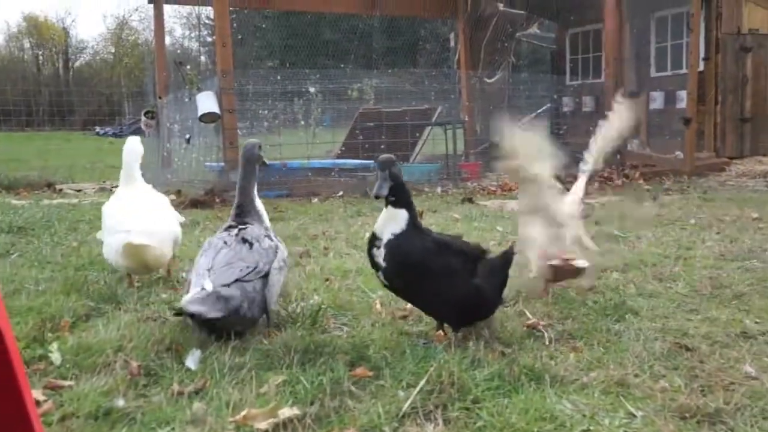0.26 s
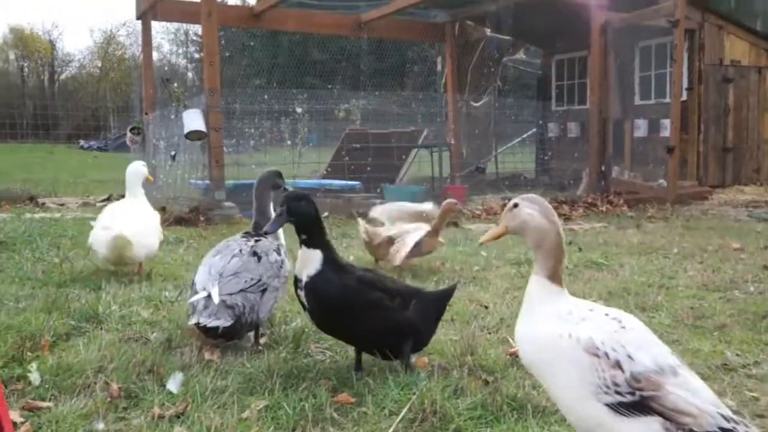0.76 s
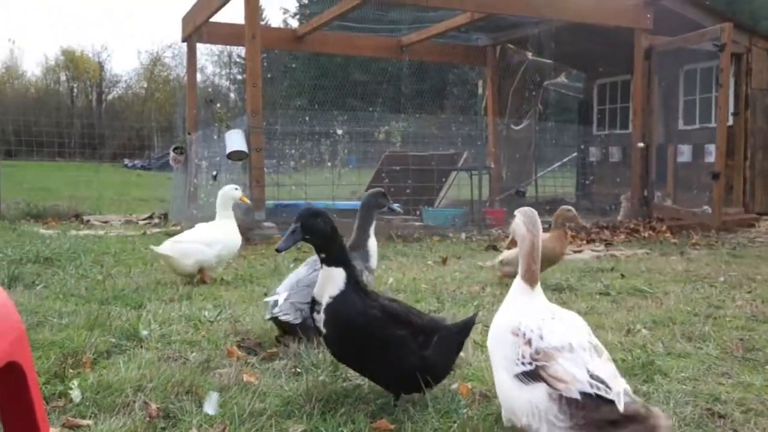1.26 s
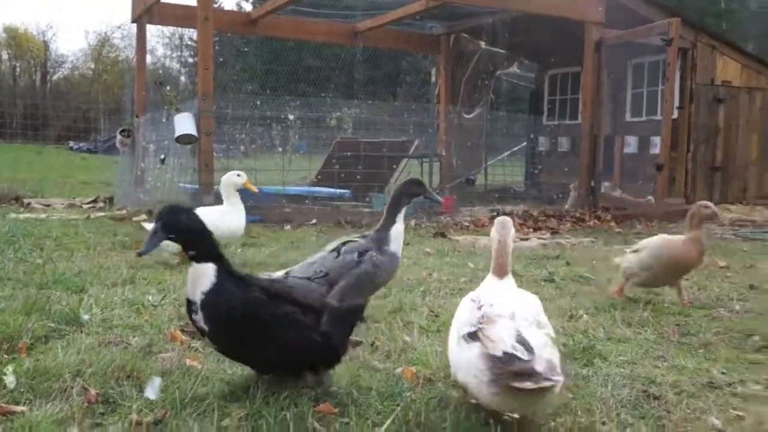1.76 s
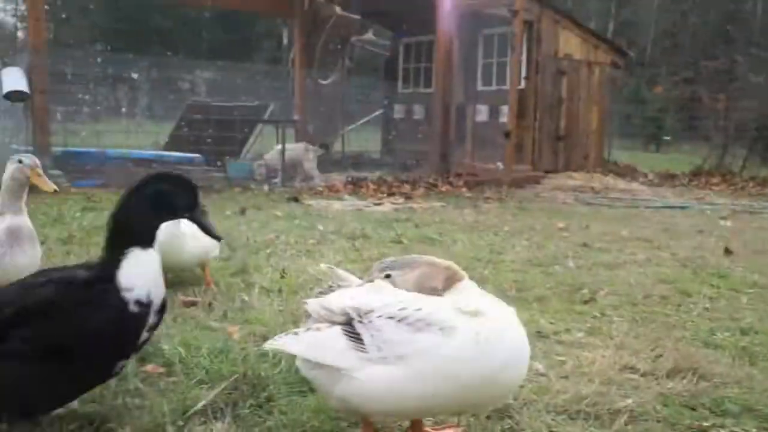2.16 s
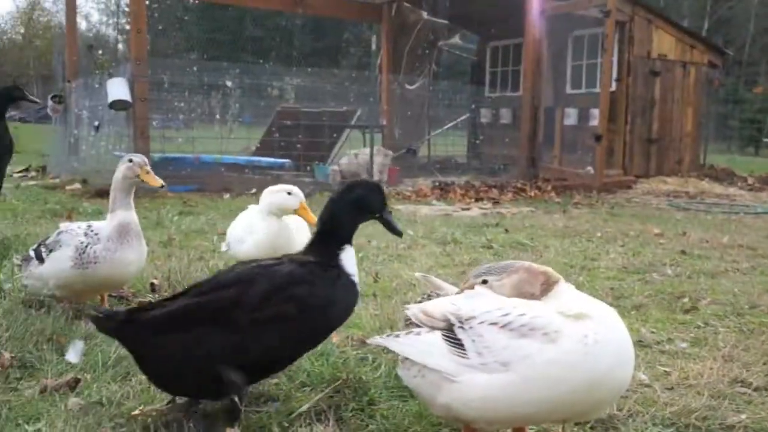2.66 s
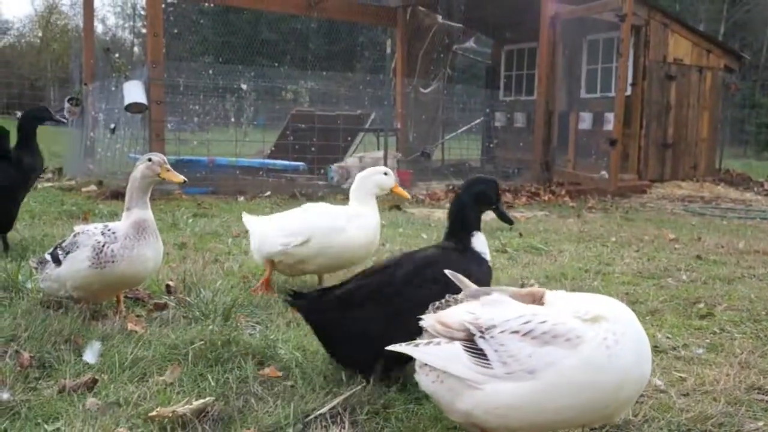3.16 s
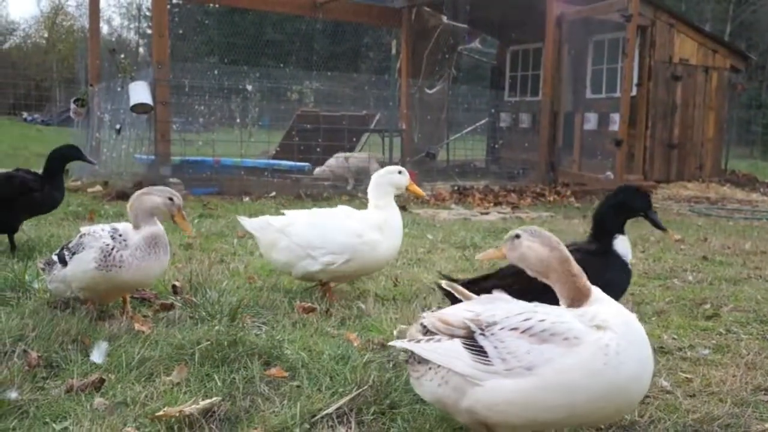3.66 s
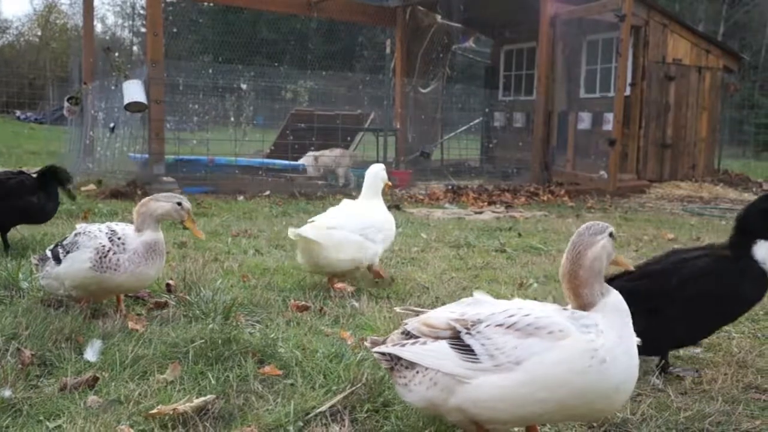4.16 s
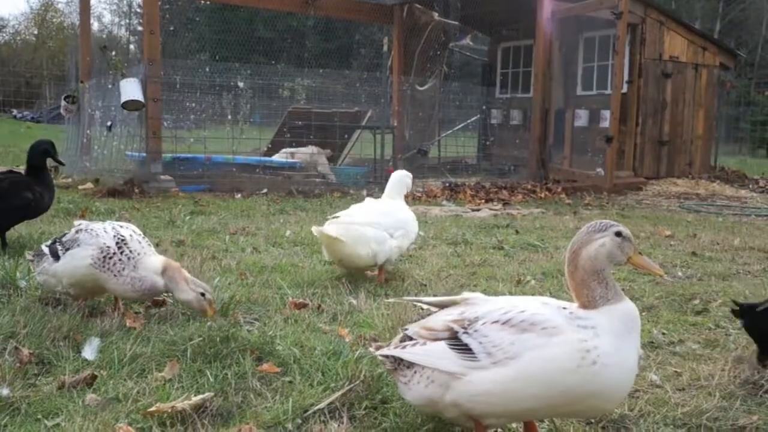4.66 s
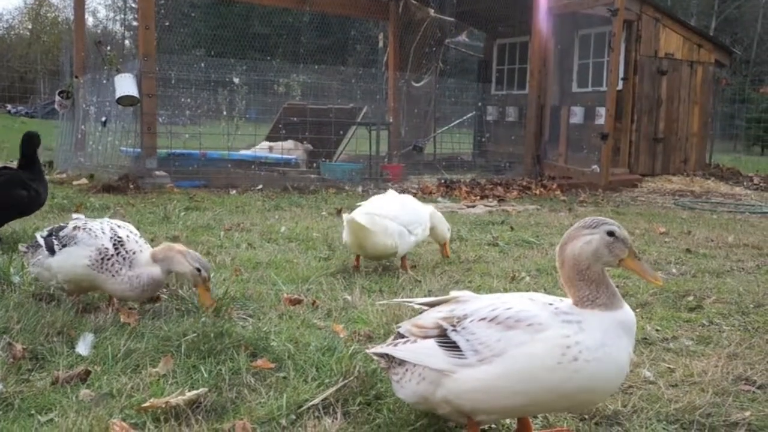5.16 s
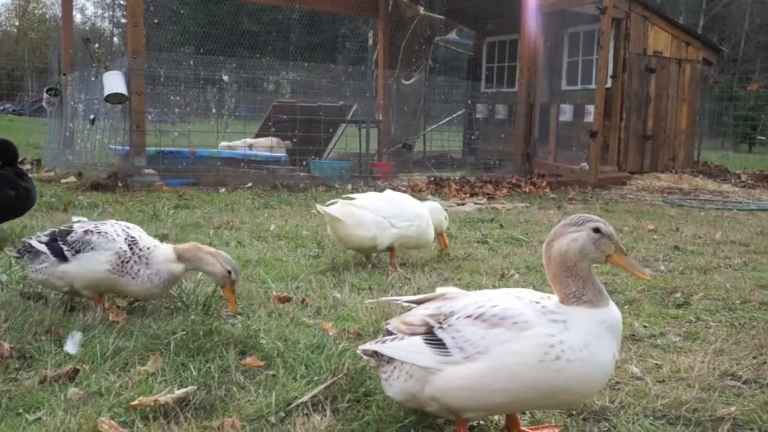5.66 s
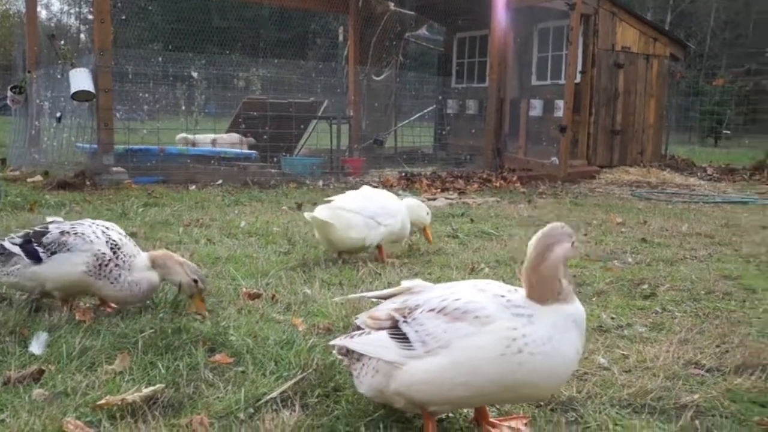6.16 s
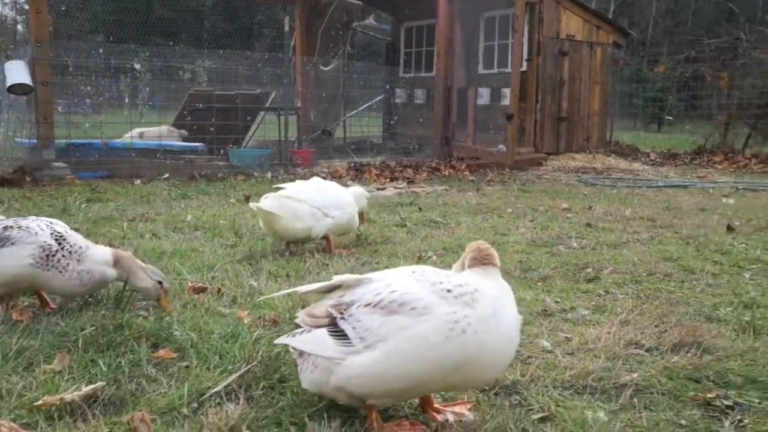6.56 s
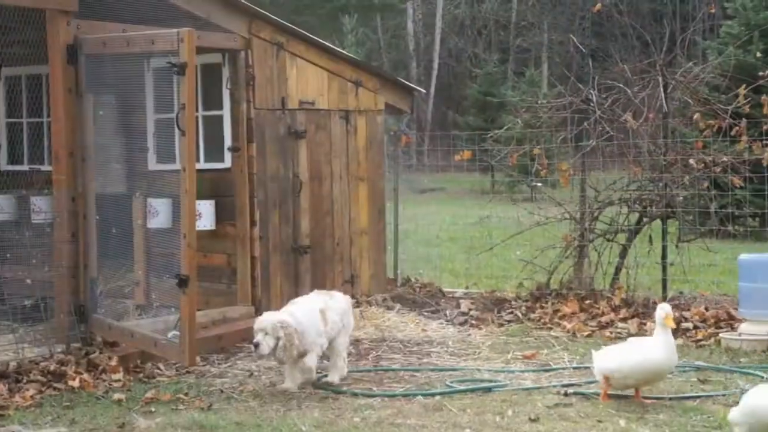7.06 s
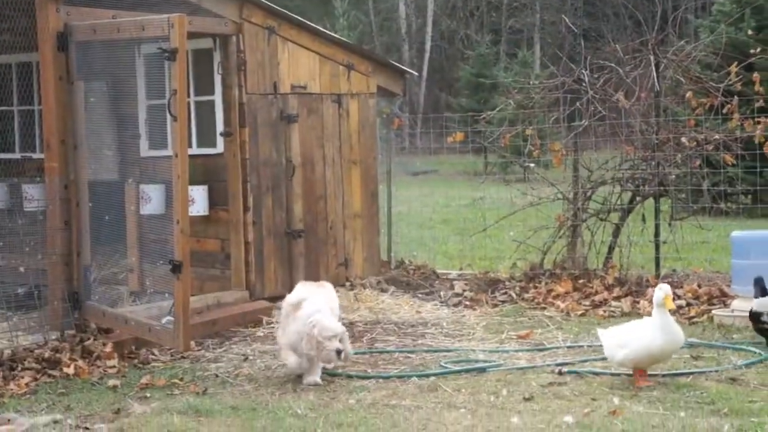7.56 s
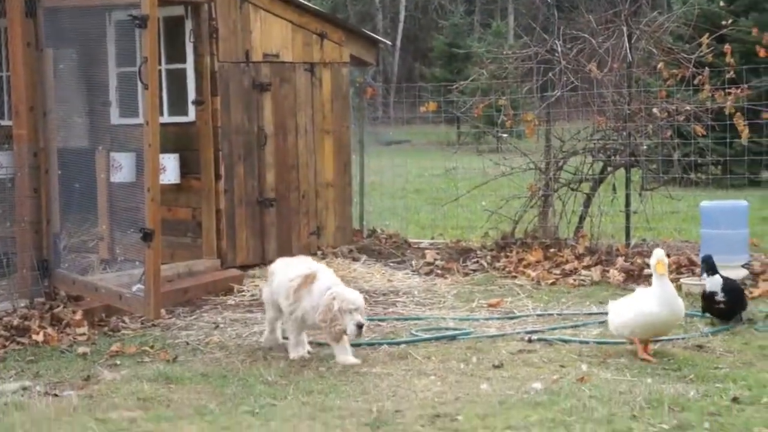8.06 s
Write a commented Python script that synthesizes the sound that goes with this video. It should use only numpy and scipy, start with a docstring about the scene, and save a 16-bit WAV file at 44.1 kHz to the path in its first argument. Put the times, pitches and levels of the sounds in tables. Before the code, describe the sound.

A flock of ducks gives short, loud, rattling quacks on a lawn, with soft clucks, thin squeals and a few wing beats.

```python
"""Loud rattling duck quacks on a lawn, among soft clucks, thin squeals and a few wing beats.
Slapping syrinx membranes ring chest, throat and beak; in squeals they sing without touching.
Webbed feet crackle in the grass, the yard echoes faintly, a distant rumble lies underneath.
Towards the end the ducks call from farther away."""
import sys
import numpy as np
from scipy import signal
from scipy.fft import rfft, irfft
from scipy.io import wavfile
from scipy.ndimage import uniform_filter1d

SR = 44100
rng = np.random.default_rng(int(sys.argv[2]) if len(sys.argv) > 2 else 0)


def pcm_store(signal):
    """Save signal as 16-bit PCM."""
    levels = np.round(np.clip(np.atleast_2d(signal), -1, 1) * 32767)
    wavfile.write(sys.argv[1], SR, levels.astype(np.int16).T)


N = 366912
TIME = np.arange(N) / SR

# t/s, length/s, level/dB, slap rate/Hz, roughness/0-1, beak f/Hz, chest/dB re beak, rasp/dB re beak
QUACK_CALLS = [(-0.017, 0.053, -11.5, 206, 0.45, 1290, -12, -20.5),
               (0.151, 0.11, -12.5, 223.1, 0.58, 1284, -19.5, -20.5),
               (0.42, 0.072, -12, 240.2, 0.58, 1290, -18.5, -18.5),
               (0.6, 0.037, -16.5, 202.2, 0.48, 1290, -15, -30),
               (1.001, 0.08, -16, 215.6, 0.43, 1245, -16.5, -22.5),
               (1.223, 0.07, -13.5, 233, 0.32, 1160, -19.5, -19.5),
               (1.491, 0.0417, -15.5, 223.4, 0.51, 1690, -18.5, -15.5),
               (1.595, .09, -17.5, 219, 0.5, 1207, -14.5, -31),
               (1.931, 0.051, -16.5, 304, 0.36, 1160, -19, -26.5),
               (2.069, 0.084, -31.5, 240, 0.42, 1160, -0.5, -20),
               (2.385, 0.053, -13, 231.7, 0.19, 1180, -15.5, -28.5),
               (2.601, 0.046, -12, 249.6, .25, 1256, -19, -20),
               (2.841, .072, -13.5, 255, 0.37, 1275, -18, -22),
               (3.43, 0.05, -13, 241.8, 0.34, 1220, -16.5, -25),
               (3.479, 0.044, -21, 251, 0.72, 1440, -7, -19), (4.494, 0.046, -26, 329.8, .9, 1060, -2, -19),
               (4.683, 0.048, -16, 210.1, 0.67, 1260, -11, -33),
               (5.222, 0.046, -17, 231.4, 0.1, 1290, -8.5, -25),
               (5.49, 0.058, -17.5, 245.4, 0.16, 1315, -8.5, -25.5),
               (6.872, 0.051, -32.5, 241.4, 0.8, 1247, -17, -40),
               (7.236, 0.069, -28.5, 228.8, 0.64, 1220, -14, -21.5),
               (7.445, .046, -22, 243.6, 0.49, 1334, -17, -26.5),
               (7.636, 0.039, -24.5, 226.5, 0.59, 1340, -16, -35),
               (7.813, 0.052, -21.5, 242.6, 0.51, 1256, -13.5, -36),
               (8.17, 0.07, -25, 242.7, 0.49, 1186, -14, -27),
               (8.28, 0.059, -26, 249.5, 0.22, 1300, -13.5, -22)]
# clucks, bill nearly shut: t/s, length/s, chest level/dB, beak level/dB
CLUCK_CALLS = [(0.051, 0.017, -36.5, -33), (0.538, 0.033, -36.5, -47.5), (0.728, 0.017, -41.5, -52.5),
               (0.861, 0.032, -35, -42.5), (1.161, 0.01, -46, -45.5), (1.37, 0.025, -36.5, -40.5),
               (1.525, 0.031, -41.5, -34), (1.849, 0.015, -46.5, -43), (1.976, 0.069, -48.5, -42.5),
               (2.245, 0.025, -44.5, -40), (2.511, 0.047, -41, -51), (3.254, 0.074, -46, -49.5),
               (3.37, 0.053, -39.5, -44.5), (3.607, 0.028, -45.5, -51), (3.652, 0.023, -49.5, -48),
               (3.908, 0.02, -50, -60.5), (4.109, 0.022, -43.5, -54), (4.3, 0.038, -44, -47.5),
               (4.438, 0.11, -50.5, -42), (4.576, .045, -45, -49), (5.056, 0.021, -42.5, -53.5),
               (5.153, 0.073, -43, -50.5), (5.307, 0.02, -39, -47.5), (7.027, 0.028, -55, -44),
               (7.321, 0.021, -52, -41.5), (7.753, 0.016, -49, -44.5), (7.775, 0.035, -45, -36),
               (8.007, .023, -47, -45), (8.049, 0.03, -45.5, -38)]
# throat resonances: f/Hz, width/Hz, level/dB
THROAT_MODES = [(877, 150, 0), (723, 100, -0.5)]


def quacks(swell_s=.021, sag_per_s=6.0, beak_fall=.0795, chest_fall=.7, throat_db=-8, gain_db=-2.2):
    """Slaps ring chest, throat and beak; the beak resonances sink as the bill closes."""
    # resonances: f/Hz, width/Hz, level/dB
    chest_modes = [(217, 267, 0.5), (404, 139, 3)]
    upper_beak_modes = [(1742, 82, 8), (2276, 172, -6.5), (2720, 590, -9)]
    rasp_modes = [(4100, 1200, 4), (5114, 710, 5.5), (5900, 700, -4)]
    hiss_modes = [(8330, 260, 0), (9770, 1400, -9.5)]
    out = np.zeros(N)
    for start_s, length_s, db, rate_hz, rough, beak_hz, chest_db, rasp_db in QUACK_CALLS:
        upper_db, hiss_db, _ = voice_at(start_s)
        t, effort = arch(swell_s, max(length_s - swell_s, swell_s / 2))
        slaps, puffs = syrinx(t, rate_hz, rough, sag_per_s * rough * length_s)  # harsh calls sink most
        source = slaps + .5 * rough * puffs
        beak = slide(band(resonate(source, [(beak_hz, 150, 0)]), 783, 1800), beak_fall)
        throat = band(resonate(source, THROAT_MODES), 620, 887)
        chest = slide(band(resonate(source, chest_modes), 176, 534), chest_fall * rough)
        gape = 1 + .05 * rng.standard_normal()  # the bill opens differently each time
        gape_modes = [(hz * gape, width_hz, mode_db) for hz, width_hz, mode_db in upper_beak_modes]
        upper = slide(band(resonate(source, gape_modes), 1510, 2750), beak_fall)
        rasp = band(resonate(puffs + .36 * slaps, rasp_modes), 2200, 6800)
        hiss = resonate(puffs, hiss_modes)
        bass = from_db(chest_db) * even(chest)
        mids = even(beak) + from_db(throat_db + chest_db / 2) * even(throat)
        mids += from_db(upper_db) * even(upper)
        treble = from_db(rasp_db) * even(rasp) + from_db(hiss_db) * even(hiss)
        call = bass * effort ** .5 + mids * effort + treble * effort ** 1.4
        add(out, start_s, from_db(db + gain_db) * band(call, 78, 14000))
    return out


def clucks(rate_hz=270, swell_share=.29, throat_fall=.301, throat_db=-4, gain_db=6.5):
    """A few uneven slaps ring chest, throat and beak; the throat resonance sinks."""
    # resonances: f/Hz, width/Hz, level/dB
    beak_modes = [(1168, 93, 8.5), (1580, 950, -6), (2222, 710, -7), (3910, 2300, -18)]
    out = np.zeros(N)
    for start_s, length_s, chest_db, beak_db in list(CLUCK_CALLS) + chatter():
        t, effort = arch(swell_share * length_s, (1 - swell_share) * length_s + .004)
        slaps, puffs = syrinx(t, rate_hz, rough=.6, sag=.68)
        source = slaps + 1.21 * puffs
        chest = band(resonate(source, [(352, 99, 0)]), 170, 630)
        throat = slide(band(resonate(source, THROAT_MODES), 616, 910), throat_fall)
        beak = band(resonate(source, beak_modes), 786, 4500)
        mouth = from_db(throat_db) * even(throat) + even(beak)
        call = from_db(chest_db) * even(chest) + from_db(beak_db) * mouth
        add(out, start_s, from_db(gain_db) * call * effort)
    return out


def chatter(count=12, until_s=2.9, length_s=.025, chest_db=-47, beak_db=-53, spread_db=6.0):
    """Faint random clucks of the excited flock, as rows like CLUCK_CALLS."""
    return [(until_s * when, length_s,
             chest_db + spread_db * (2 * chest - 1), beak_db + spread_db * (2 * beak - 1))
            for when, chest, beak in rng.random((count, 3))]


def syrinx(t, rate_hz, rough, sag, jitter=.2, shimmer_db=5, skip=.68):
    """Membrane slaps and the air puff after each; the rate sags, roughness weakens every second slap."""
    slap_hz = rate_hz * (1 + sag * (.5 - t / t[-1])) * np.exp(jitter * rough * drift(260, len(t)))
    cycles = np.cumsum(slap_hz) / SR + rng.random()
    index = cycles.astype(int)
    strength = from_db(shimmer_db * rough * rng.standard_normal(index[-1] + 1))[index]
    strength *= 1 - np.clip(skip * rough, 0, 1) * (index % 2)
    slaps = np.diff(index, prepend=index[0]) * strength
    puffs = strength * np.exp(-3 * (cycles % 1)) * rng.standard_normal(len(t))
    return rms_one(slaps), rms_one(puffs)


def voice_at(time_s):
    """Timbre of the caller whose turn it is."""
    # caller: upper beak/dB, hiss/dB, second partial of the lead-in/dB
    voices = {"flock": (-8.5, -45, -13), "hissy bird": (-11, -25.5, -8), "across the yard": (-5, -39, 3)}
    # turns: start t/s, caller
    turns = [(-1, "flock"), (3.1, "hissy bird"), (4.2, "flock"), (5.0, "hissy bird"),
             (6.6, "across the yard")]
    callers = [caller for start_s, caller in turns if start_s <= time_s]
    return voices[callers[-1]]


def lead_ins(quack_db=-9.0, cluck_db=-3):
    """A falling tone opens each listed quack and cluck, at a level relative to the call."""
    out = np.zeros(N)
    for start_s, _, db, *_ in QUACK_CALLS:
        add(out, *lead_in(start_s, db + quack_db, second_db=voice_at(start_s)[-1]))
    for start_s, _, _, beak_db in CLUCK_CALLS:
        add(out, *lead_in(start_s, beak_db + cluck_db, second_db=-18))
    return out


def lead_in(call_s, db, second_db, swell_s=.016, fade_s=.013, end_hz=880, drop=.3614, drop_s=.00898):
    """Membranes sing hoarsely, sinking in pitch, before they touch; returns start time and tone."""
    t, effort = arch(swell_s, fade_s)
    glide_hz = end_hz * (1 + drop * np.exp(-t / drop_s))
    detune = .07 * rng.standard_normal()
    hoarseness = .05 * drift(900, len(t))
    tone = two_partials(glide_hz * (1 + detune + hoarseness), second_db)
    return call_s - swell_s / 2, from_db(db) * effort * tone


def squeals(lift=.038, droop=.068, droop_s=.015, waver=.006):
    """One wavering voice glides; effort lifts its pitch, which droops as the air runs out."""
    # t/s, length/s, first f/Hz, last f/Hz, level/dB
    glides = [(0.54, 0.025, 1150, 753, -30), (0.858, .024, 1096, 943, -31), (3.324, 0.055, 964, 1232, -31),
              (3.403, 0.034, 1260, 954, -27.5), (4.248, 0.28, 1000, 2150, -51),
              (4.335, .053, 2140, 2630, -50), (4.43, .085, 1300, 1072, -33),
              (4.494, 0.24, 2335, 2190, -42.5), (5.14, .14, 1040, 1208, -47)]
    out = np.zeros(N)
    for start_s, length_s, first_hz, last_hz, db in glides:
        t, effort = arch(length_s / 2, length_s / 2)
        spent = np.exp(np.minimum(t - length_s, 0) / droop_s)
        bend = lift * effort - droop * spent + waver * drift(39, len(t))
        glide_hz = np.interp(t, [0, length_s], [first_hz, last_hz])
        add(out, start_s, sing(glide_hz * (1 + bend), effort, db))
    return out


def squeaks(unison_hz=1785, parting_hz=482, lower_db=-2):
    """The two sides of the syrinx part from unison as effort grows, then meet again."""
    # t/s, length/s, level/dB
    calls = [(1.35, .066, -30.5), (1.419, 0.02, -30.5), (1.439, .03, -31.5), (1.468, .032, -32)]
    out = np.zeros(N)
    for start_s, length_s, db in calls:
        _, effort = arch(length_s / 2, length_s / 2)
        apart_hz = parting_hz * effort ** .5
        add(out, start_s, sing(unison_hz + apart_hz, effort, db))
        add(out, start_s, sing(unison_hz - apart_hz, effort, db + lower_db))
    return out


def sing(pitch_hz, effort, db, air_db=-6, husky_hz=2000, husky_db=-30, waver=.04):
    """Membranes sing without touching; higher, harder-blown tones are huskier."""
    # resonances: f/Hz, width/Hz, level/dB
    beak_modes = [(1800, 1000, 20), (4630, 1240, -8)]
    size = len(pitch_hz)
    husk = pitch_hz.mean() / husky_hz * from_db(min(db - husky_db, 0))
    wavering_hz = pitch_hz * (1 + waver * husk * drift(1200, size))
    tone = rms_one(two_partials(wavering_hz, second_db=-13))
    air = rms_one(band(resonate(rng.standard_normal(size), beak_modes), 1000, 6800))
    sound = tone * from_db(4.2 * drift(300, size)) + from_db(air_db) * husk ** 2 * air
    return from_db(db) * sound * effort ** .5


def wings(swish_db=-10):
    """Each beat pushes a low puff of air while the feathers swish."""
    # t/s, length/s, puff level/dB
    beats = [(0.072, 0.049, -24.5), (0.102, 0.036, -24.5), (0.316, 0.036, -35), (2.291, 0.057, -33.5),
             (2.696, 0.027, -31), (2.741, 0.047, -31.5), (2.823, 0.019, -28.5)]
    out = np.zeros(N)
    for start_s, length_s, db in beats:
        t, speed = arch(length_s / 2, length_s / 2)
        puff = rms_one(band(rng.standard_normal(len(t)), 249.3, 411))
        flutter = rng.standard_normal(len(t)) * from_db(2.6 * drift(500, len(t)))
        swish = rms_one(band(flutter, 1100, 5300, order=1))
        add(out, start_s, from_db(db) * speed * (puff + from_db(swish_db) * swish))
    return out


def snaps(decay_s=.0049):
    """Stems and dry leaves crack underfoot; the crack near 7.37 s is a brief swish of feathers."""
    # t/s, peak level/dB
    breaks = [(0.048, -22), (0.6538, -30.5), (1.32, -26.5), (2.5862, -32.5), (2.724, -31.5), (2.9776, -35),
              (4.0903, -35.5), (4.2013, -27.5), (5.4146, -37.5), (7.372, -26.5)]
    out = np.zeros(N)
    t = np.arange(SR // 40) / SR
    for start_s, db in breaks:
        crack = band(rng.standard_normal(len(t)) * np.exp(-t / decay_s), 1600, 9700, order=1)
        add(out, start_s, from_db(db) * crack / np.abs(crack).max())
    return out


def grass(blades_per_s=70, decay_s=.0026, hiss_db=3):
    """Trodden blades crackle in clumps over a soft hiss."""
    # rustle: t/s, level/dB
    levels = [(0.0, -46), (0.14, -51.5), (1.88, -62.5), (2.39, -59), (3.96, -66.5), (4.36, -60),
              (5.95, -64), (6.19, -59.5), (7.78, -69), (8.32, -60)]
    # hiss: f/Hz, density/dB
    spectrum = [(100, -19), (1200, -23), (4200, -7), (7000, -10), (15500, -10.5)]
    sizes = from_db(6 * np.minimum(rng.exponential(1, N), 3))
    blades = sizes * (rng.random(N) < blades_per_s * from_db(4 * drift(20, N)) / SR)
    envelope = signal.lfilter([1], [1, -np.exp(-1 / (decay_s * SR))], blades + 1e-18)
    crackle = rms_one(band(envelope * rng.standard_normal(N), 2390, 18000, order=1))
    hiss = from_db(hiss_db + drift(49, N)) * coloured(spectrum, side_db=-46)
    return gain_curve(levels) * (hiss + crackle)


def two_ears(x, pan_db, shade_hz=700, scatter_s=.0011, scatter_db=-15):
    """Bass reaches both sides alike; treble is shaded on one side and scattered by the ground."""
    high = signal.sosfilt(signal.butter(1, shade_hz, "high", fs=SR, output="sos"), x)
    scatter = np.interp(TIME - scatter_s, TIME, band(x, 1500, 4500, order=1))
    side = np.tanh(np.log(from_db(pan_db)) / 2) * high + from_db(scatter_db) * scatter
    return x + side * [[1], [-1]]


def yard_echo(x, delay_s=.008, near_t60_s=.16, far_t60_s=.7, far_db=-15):
    """Scatter from the nearby coop and a longer, faint tail from the trees."""
    t = np.arange(SR * 3 // 4) / SR
    decay = (from_db(-60 * t / near_t60_s) + from_db(far_db - 60 * t / far_t60_s)) * (t > delay_s)
    response = band(rng.standard_normal((2, len(t))) * decay, 1800, 6600, order=1)
    response /= np.sqrt(np.mean(np.abs(rfft(response, SR)[:, 1000:2000]) ** 2))  # unit gain, 1-2 kHz
    return signal.fftconvolve(x, response, axes=1)[:, :N]


def rumble():
    """Distant low noise, slowly rising and falling."""
    # t/s, level/dB
    levels = [(0.0, -38.5), (0.79, -58.5), (2.29, -52.5), (2.73, -47), (2.92, -55.5), (6.37, -55),
              (7.67, -66), (8.32, -55)]
    # f/Hz, density/dB
    spectrum = [(25, -21.5), (80, -18), (190, 0.5), (280, -2.5), (370, -0.5), (480, -13), (1400, -33.5)]
    return gain_curve(levels) * coloured(spectrum, side_db=-32.5)


def murmur():
    """Soft midrange wash from the yard."""
    # t/s, level/dB
    levels = [(0, -36), (.75, -49), (1.8, -55.5), (2.75, -42.5), (3.1, -64.5), (6.25, -64.5), (6.75, -54),
              (8.32, -49.5)]
    # f/Hz, density/dB
    spectrum = [(70, -60), (300, -7), (1300, -1.5), (2000, -6), (6000, -30)]
    return gain_curve(levels) * coloured(spectrum, side_db=-9)


def from_db(db):
    """Decibels to gain."""
    return 10 ** (np.asarray(db) / 20)


def rms_one(x):
    """Scale to unit power."""
    return x / np.sqrt(np.mean(x ** 2) + 1e-20)


def even(x, window_s=.011):
    """Hold power steady over a few slaps, so effort alone shapes the loudness."""
    power = np.abs(uniform_filter1d(x * x, int(window_s * SR)))
    return x / np.sqrt(power + .00083 * np.mean(x * x))


def gain_curve(rows):
    """Rows of t/s, level/dB to gain per sample."""
    return from_db(np.interp(TIME, *np.transpose(rows)))


def band(x, low_hz, high_hz, order=2):
    """Butterworth band-pass."""
    return signal.sosfilt(signal.butter(order, [low_hz, high_hz], "band", fs=SR, output="sos"), x)


def resonate(x, modes):
    """Parallel resonances with alternating signs."""
    out = 0
    for k, (hz, width_hz, db) in enumerate(modes):
        r = np.exp(-np.pi * width_hz / SR)
        poles = [1, -2 * r * np.cos(2 * np.pi * hz / SR), r * r]
        out += (-1) ** k * from_db(db) * (1 - r * r) / 2 * signal.lfilter([1, 0, -1], poles, x)
    return out


def slide(x, fall):
    """Time warp: frequencies sink by the share `fall` from start to end."""
    way = np.linspace(0, 1, len(x))
    return np.interp(way + fall * way * (1 - way) / 2, way, x)


def two_partials(pitch_hz, second_db):
    """Gliding sine plus its octave."""
    phase = 2 * np.pi * np.cumsum(pitch_hz) / SR
    return np.sin(phase) + from_db(second_db) * np.sin(2 * phase)


def drift(rate_hz, size):
    """Random curve of spread about 1, with knots at rate_hz."""
    steps = np.arange(size) * rate_hz / SR
    knots = rng.standard_normal(int(steps[-1]) + 2)
    return np.interp(steps, np.arange(len(knots)), knots)


def arch(swell_s, fade_s):
    """Times and height of a rounded rise and fall."""
    t = np.arange(int((swell_s + fade_s + .01) * SR)) / SR
    return t, np.sin(np.interp(t, [0, swell_s, swell_s + fade_s], [0, np.pi / 2, np.pi]))


def add(out, start_s, sound):
    """Mix a sound into the track."""
    at = int(start_s * SR)
    sound = sound[max(-at, 0):N - at]
    at = max(at, 0)
    out[at:at + len(sound)] += sound


def coloured(spectrum, side_db):
    """Unit-power stereo noise with the given spectrum."""
    hz, db = np.transpose(spectrum)
    gain = from_db(np.interp(np.log(np.fft.rfftfreq(N, 1 / SR) + 1), np.log(hz), db))
    mid, side = irfft(rfft(rng.standard_normal((2, N))) * gain, N)
    return rms_one(mid + from_db(side_db) * side * [[1], [-1]])


def scene():
    """Flock, echo and background."""
    # callers' position: t/s, left over right/dB, echo send/dB
    places = [(0, -1, -29), (2.9, 0, -21), (3.4, -4, -14), (4.7, -1, -13), (5.3, -5, -19), (6.9, -4, -13.5)]
    times_s, pan_db, echo_db = np.transpose(places)
    birds = lead_ins() + quacks() + clucks() + squeals() + squeaks() + wings()
    flock = two_ears(birds, np.interp(TIME, times_s, pan_db)) + snaps()
    echo = yard_echo(flock * from_db(np.interp(TIME, times_s, echo_db)))
    return flock + echo + rumble() + murmur() + grass()


def record(dry):
    """Soft peak limit, then a steep low-pass."""
    ceiling, stop_hz = .8, 16400
    rounded = ceiling * np.tanh(dry / ceiling)
    return signal.sosfilt(signal.cheby2(16, 60, stop_hz, fs=SR, output="sos"), rounded)


dry = scene()
out = record(dry)
pcm_store(out)
```